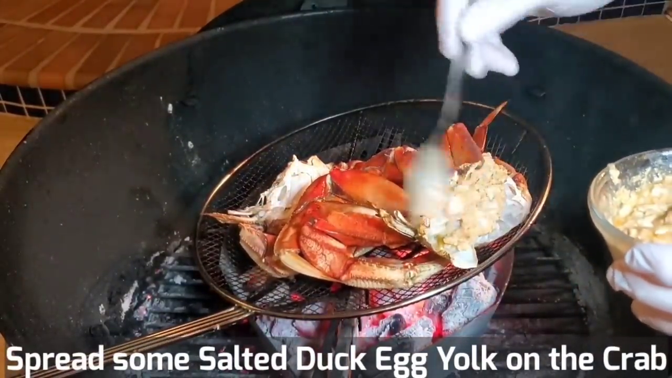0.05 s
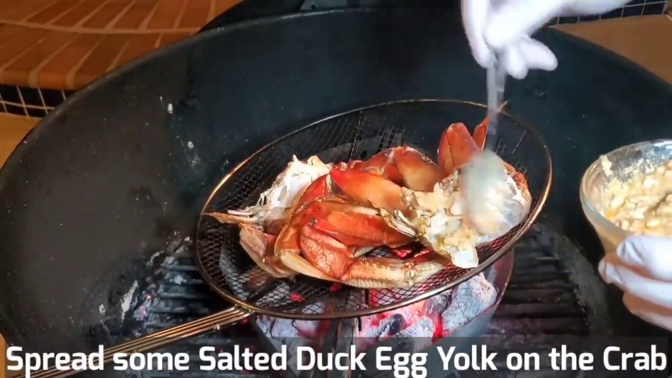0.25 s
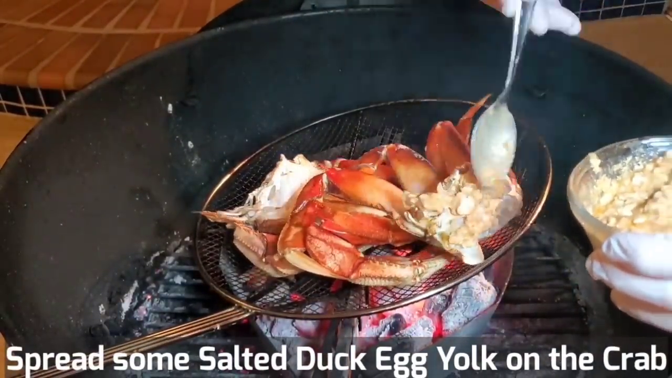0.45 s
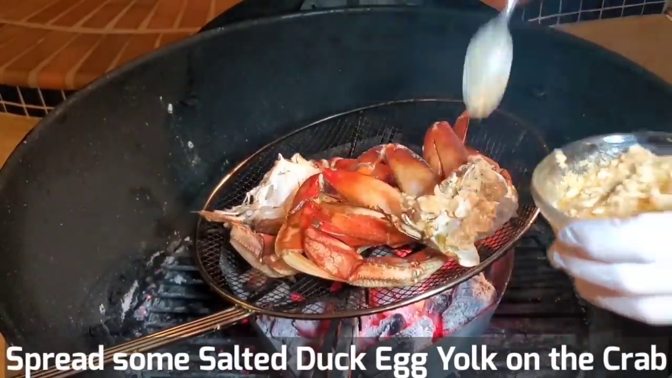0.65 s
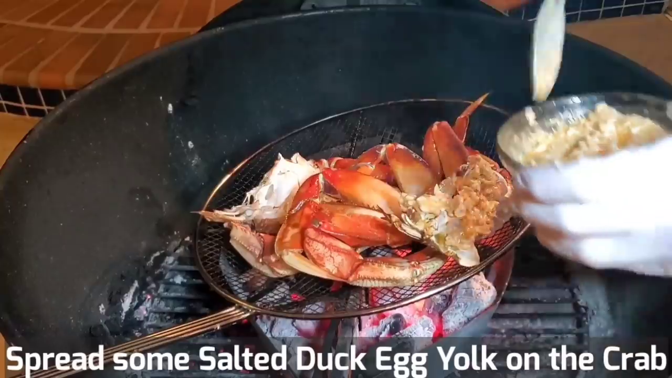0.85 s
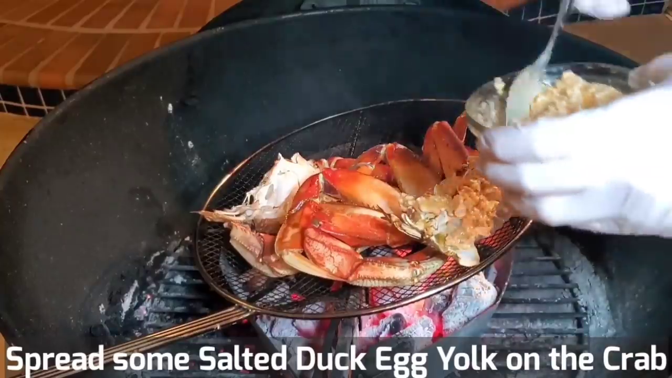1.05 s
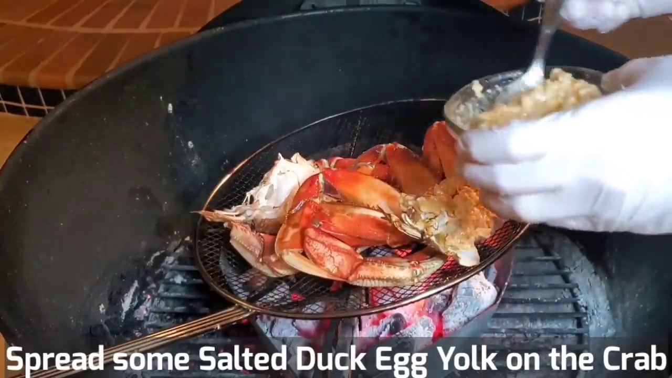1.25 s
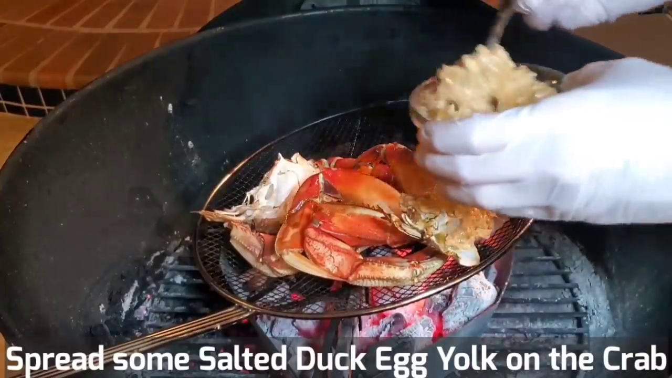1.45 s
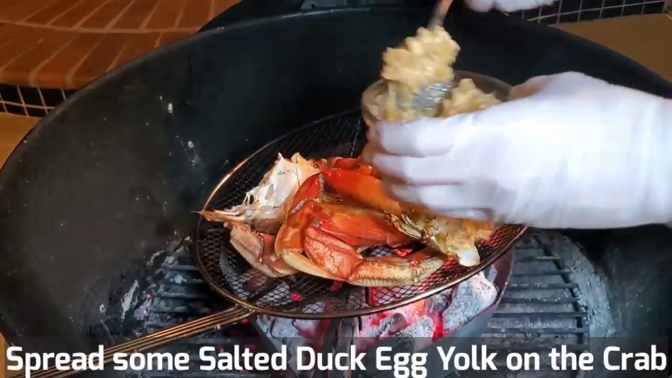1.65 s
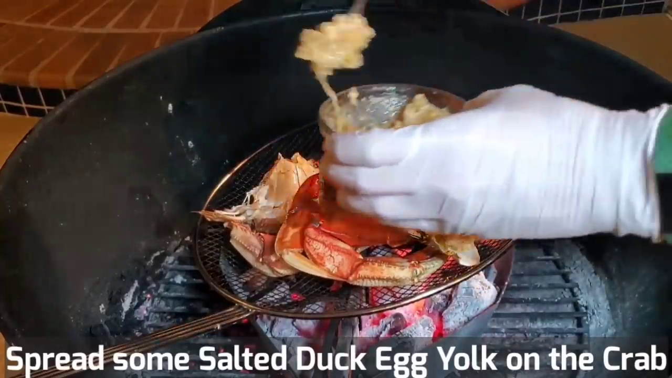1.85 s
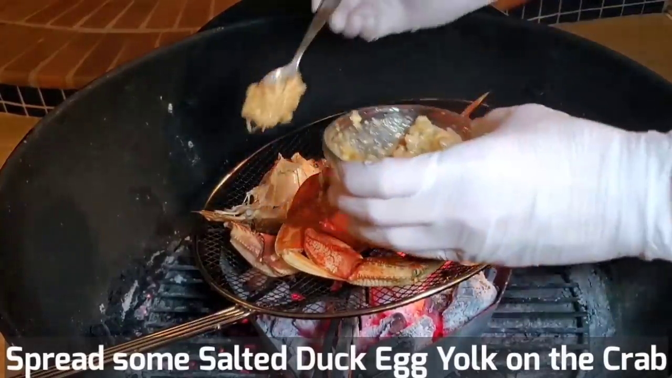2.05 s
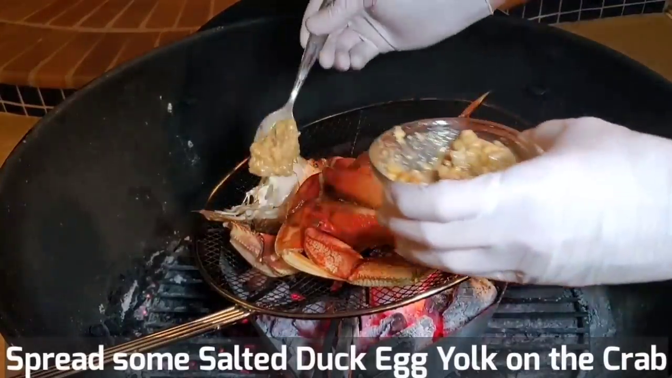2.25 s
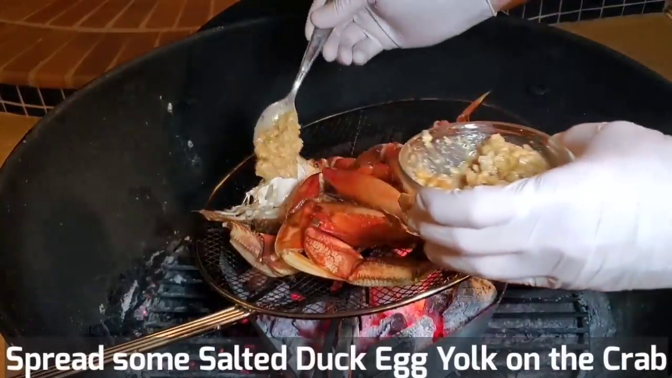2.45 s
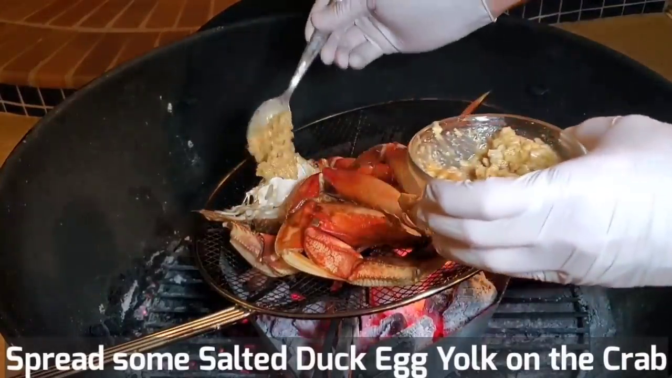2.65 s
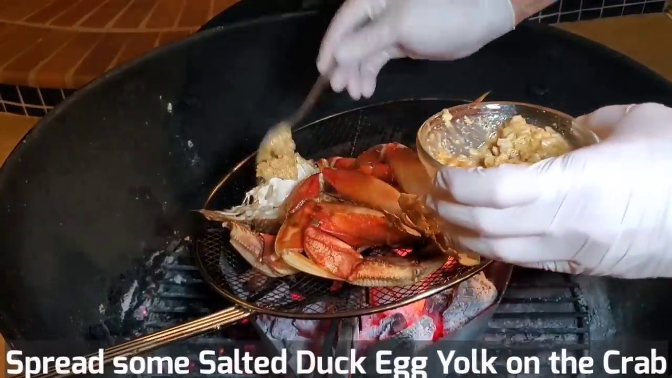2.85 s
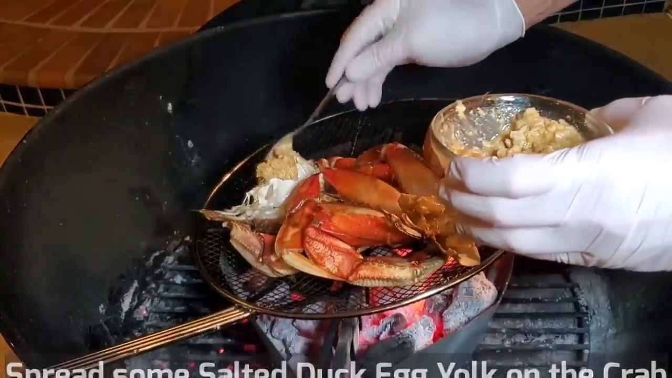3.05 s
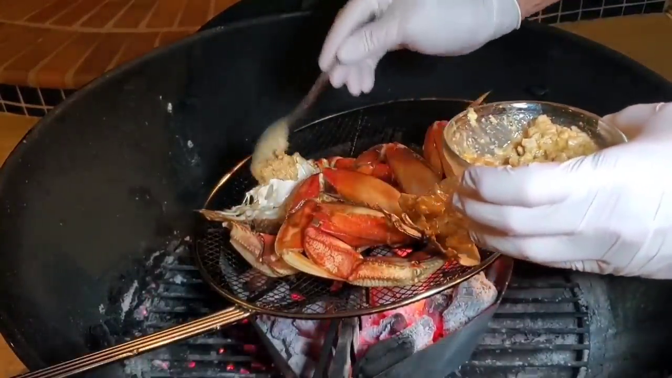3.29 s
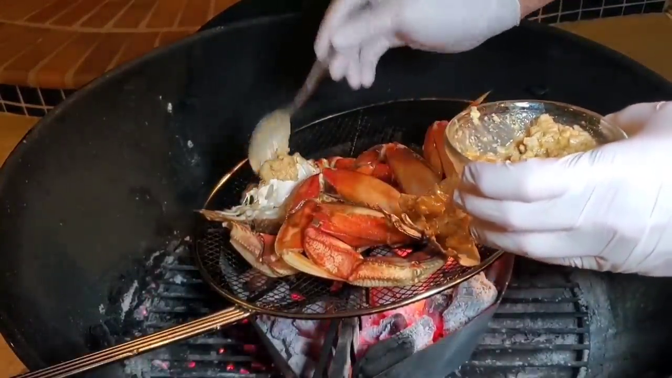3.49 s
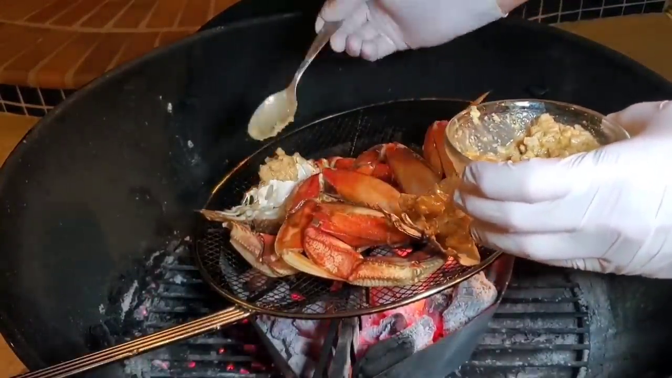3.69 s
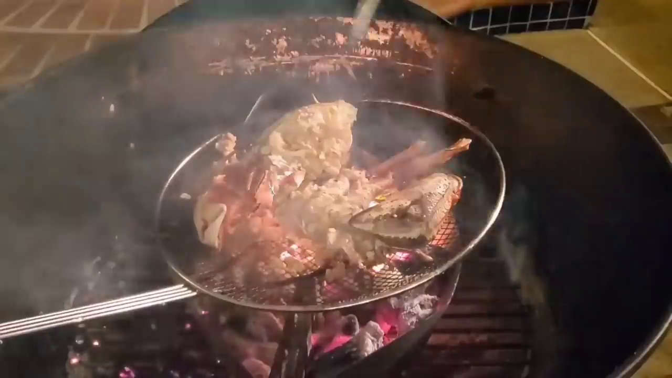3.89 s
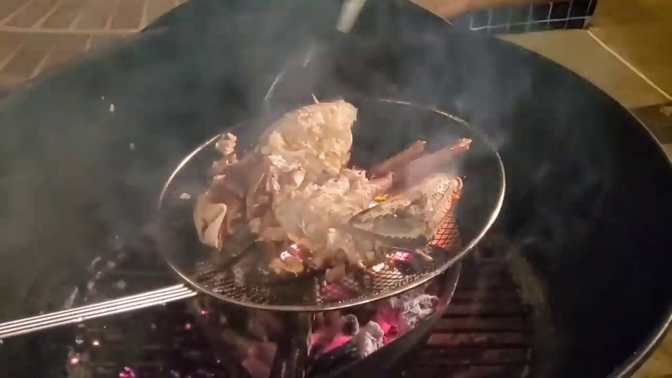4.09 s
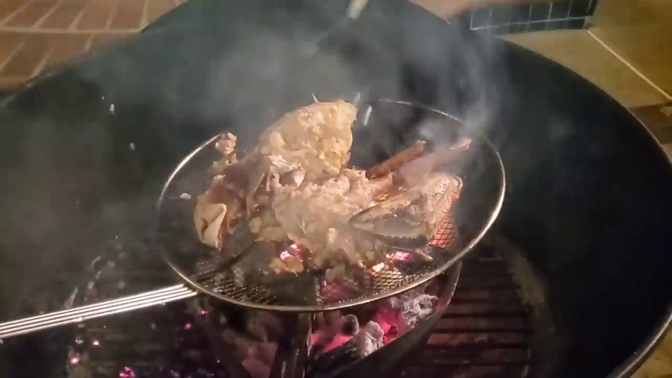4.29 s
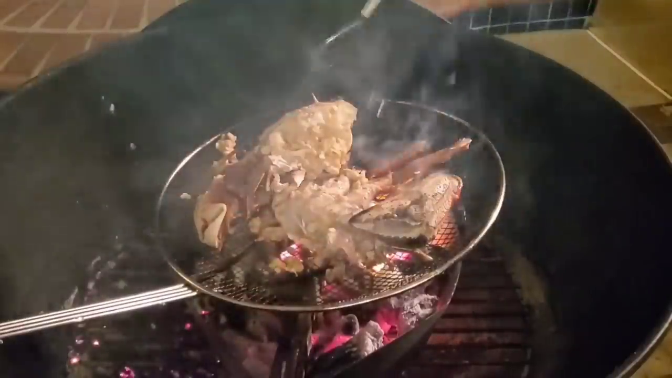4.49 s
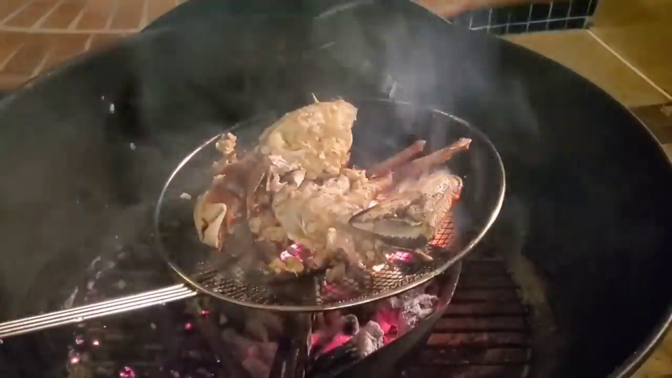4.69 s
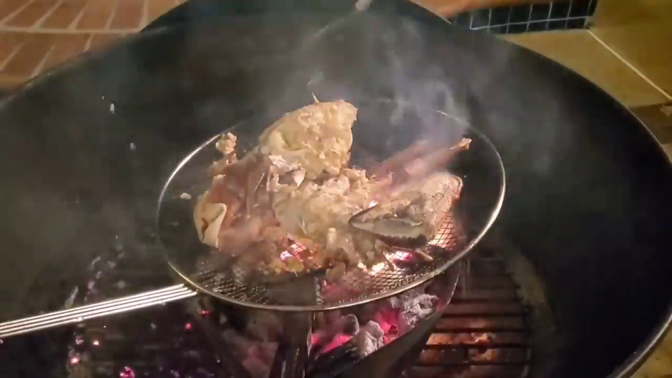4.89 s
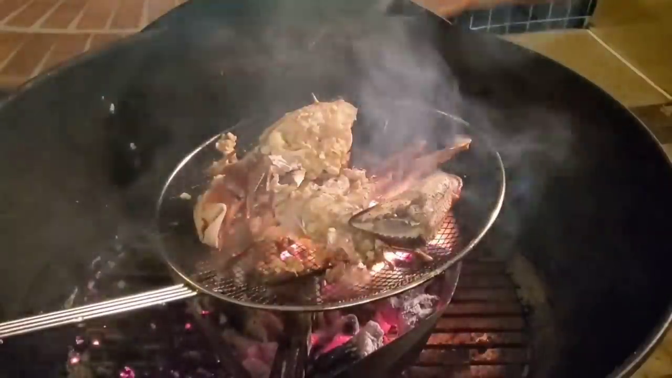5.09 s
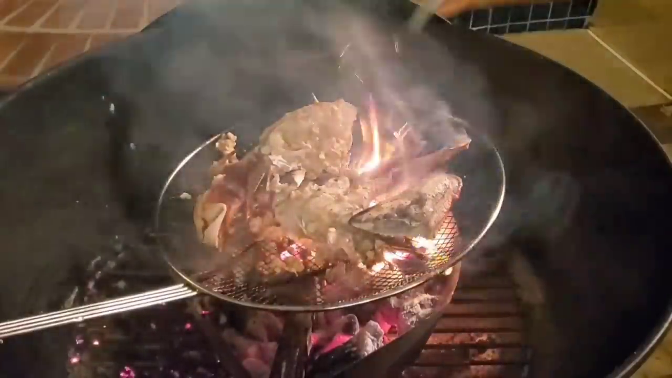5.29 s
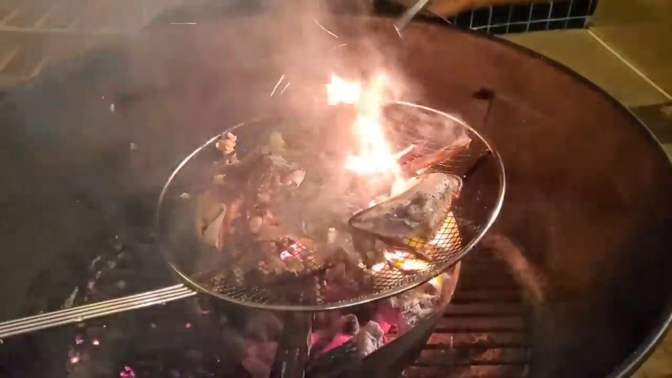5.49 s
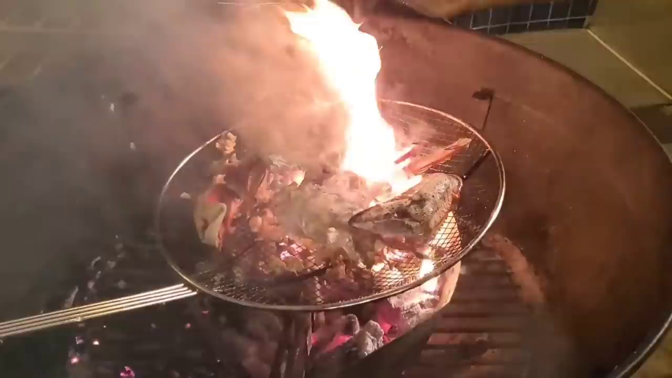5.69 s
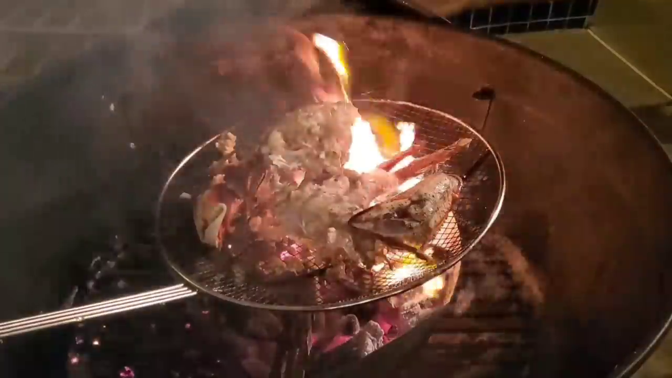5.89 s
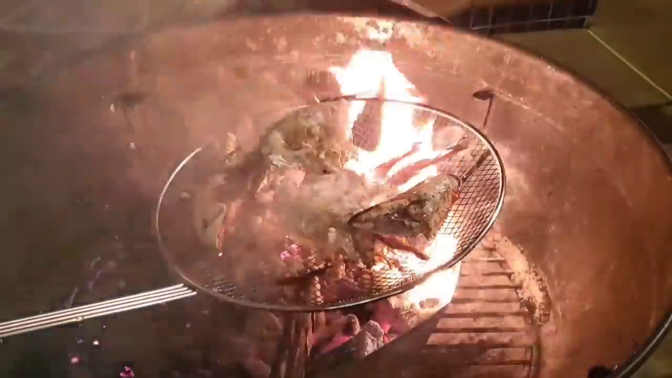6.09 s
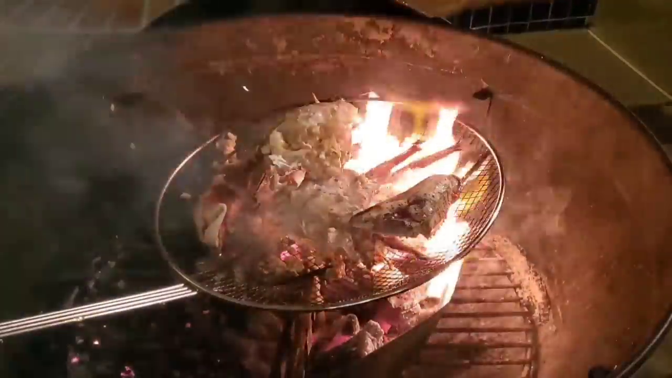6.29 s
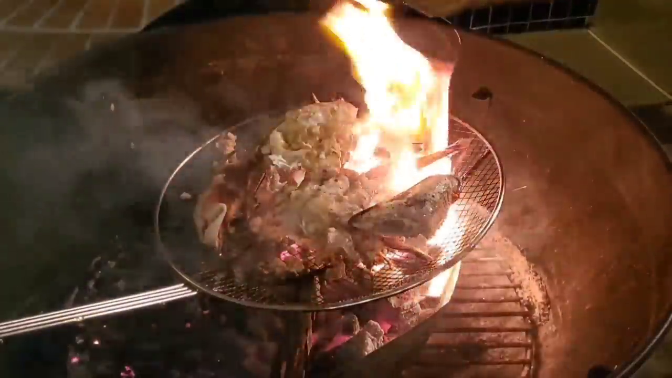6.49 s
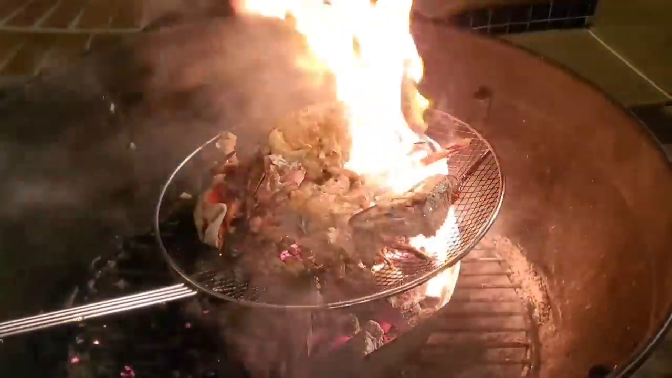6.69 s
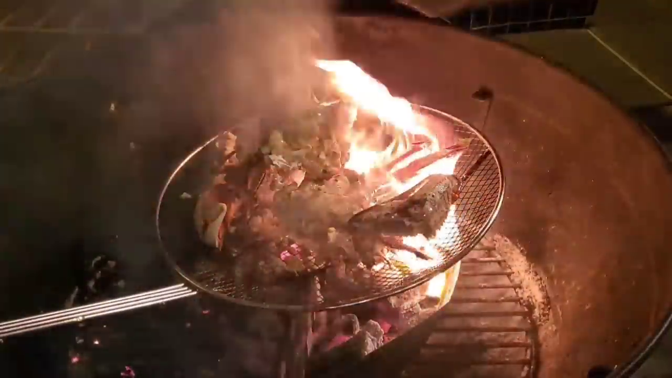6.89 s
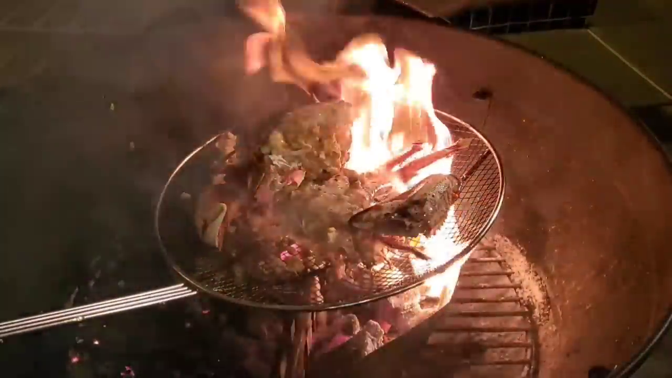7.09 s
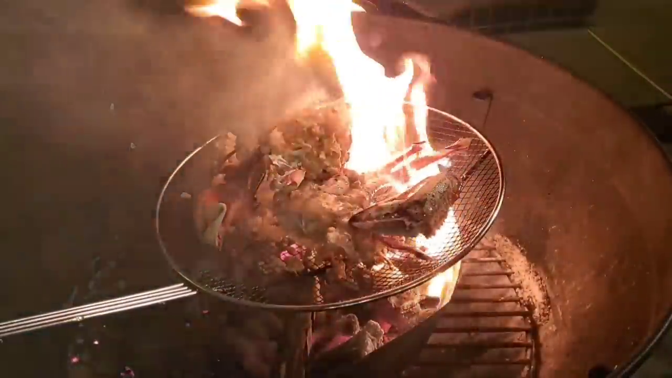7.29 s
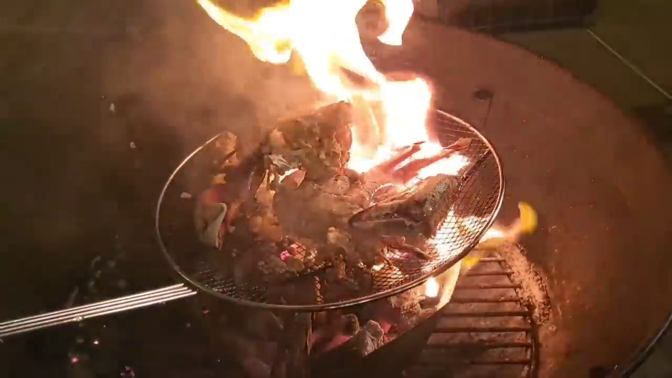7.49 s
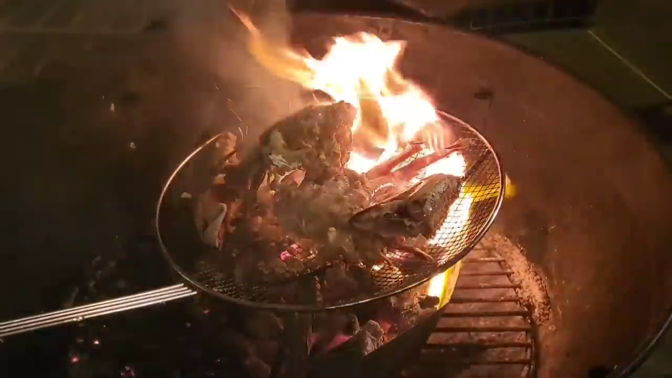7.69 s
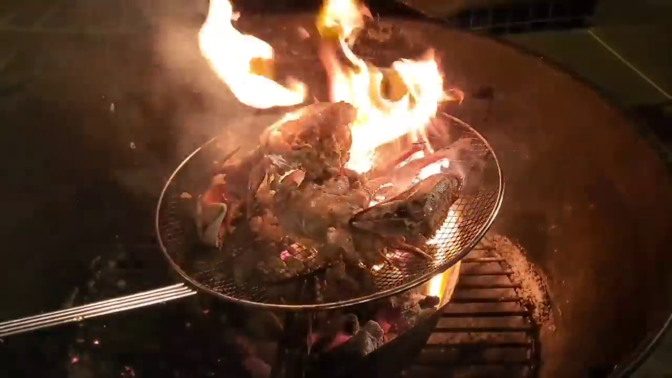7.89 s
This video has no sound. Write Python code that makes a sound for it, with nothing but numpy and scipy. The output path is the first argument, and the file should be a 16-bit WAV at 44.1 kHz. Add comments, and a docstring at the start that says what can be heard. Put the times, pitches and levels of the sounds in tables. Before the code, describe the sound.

A spoon ticks and scrapes on crab shell over a low outdoor rumble, then juices sizzle, snap and flutter over charcoal in a kettle grill.

```python
"""A spoon ticks over a low outdoor rumble, then scrapes on a crab's shell and clinks in a glass bowl.
Juices then sizzle over charcoal in a steel kettle grill, embers snap and burning drippings flutter.
Taps, scrape, sizzle and snaps are coloured noise or sparse impulses, some ringing resonances;
a thump of decaying sines and a chattering metal clank each come once, and far hoots and a whine lie behind.
Taps, snaps, spits and the thump echo in the kettle."""
import sys
import numpy as np
from scipy import signal
from scipy.fft import rfft, irfft, next_fast_len
from scipy.io import wavfile
from scipy.ndimage import uniform_filter1d, map_coordinates

SR = 44100
rng = np.random.default_rng(int(sys.argv[2]) if len(sys.argv) > 2 else 0)


def generate_wav(sig):
    """Save sig (samples, or channels by samples) to the path in sys.argv[1] as 16-bit PCM at SR."""
    pcm = np.round(np.clip(np.atleast_2d(sig).T, -1, 1) * 32767).astype(np.int16)
    wavfile.write(sys.argv[1], SR, pcm)


N = 350453
TOP_HZ = 15750  # nothing sounds above this

# Stereo likeness of most layers, of close cracks, of the draught: (frequency [Hz], left-right likeness [0-1])
ALIKE = [(40, 0.21), (80, 1), (140, 0.95), (300, 0.86), (640, 0.52), (1400, 0.49), (3100, 0.18),
         (7000, 0.0074)]
ALIKE_NEAR = [(300, 1), (1500, 0.43), (4000, 0.15), (9000, 0.041)]
ALIKE_DRAUGHT = [(30, 0.05), (100, 0.42)]
# Decay of the kettle's echo before its wall return is shaped: (frequency [Hz], t60 [s])
KETTLE_DECAY = [(200, 0.19), (1500, 0.29), (5000, 0.22), (15000, 0.2)]

# Spectra of the outdoor bed: (frequency [Hz], relative density [dB per Hz])
RUMBLE_COLOUR = [(15, -70), (25, -38), (45, 4), (62, 0), (108, 8.5), (140, 0), (195, -2.5), (285, -8),
                 (380, -18.5), (520, -24), (750, -67), (1800, -110)]
DRAUGHT_COLOUR = [(8, -70), (15, -35), (30, -9.5), (50, 2.5), (65, 1.5), (110, -17), (400, -110)]
RUSH_COLOUR = [(60, -60), (140, -2), (210, 6.5), (290, -1), (400, -11.5), (520, -4), (700, -28.5),
               (1000, -40.5), (3000, -110)]
COALS_COLOUR = [(200, -40), (600, -9), (1000, -10), (2000, -8), (3200, -7), (4500, -5.5), (8000, -5.5),
                (10000, -2), (13000, -1), (15200, 0)]
# Fader moves of rumble, hollow rush and coal hiss, before each layer's trim: (time [s], relative level [dB])
RUMBLE_MOVES = [(0.0, -54), (0.58, -49), (0.79, -58), (0.93, -52.5), (1.37, -57), (3.56, -48),
                (3.61, -53.5), (5.33, -50), (5.6, -61), (5.86, -45), (6.09, -54), (6.11, -50.5),
                (6.42, -55), (7.35, -50), (7.86, -57), (7.95, -49)]
RUSH_MOVES = [(0.0, -65.5), (0.46, -53.5), (0.77, -74), (2.54, -65.5), (2.83, -57.5), (3.14, -57.5),
              (3.83, -62), (4.25, -51), (4.6, -51.5), (5.02, -58), (5.36, -49), (6.42, -51.5),
              (6.71, -48.5), (7.08, -52.5), (7.3, -46), (7.95, -52.5)]
HISS_MOVES = [(0.0, -68.5), (0.5, -66.5), (0.67, -66.5), (0.89, -68.5), (1.21, -62), (1.71, -68),
              (2.57, -68.5), (3.04, -67), (3.43, -62), (3.85, -62.5)]
DRAUGHT_DB = -59  # the draught between gusts
# Gusts of draught: (time [s], half length [s], level [dB])
GUSTS = [(4.102, 0.083, -45.5), (5.858, 0.08, -41), (6.205, 0.16, -46.5), (6.963, 0.071, -48),
         (7.438, 0.042, -42.5)]

# Faint far hoots: (time [s], level [dB])
HOOTS = [(.745, -72), (1.725, -67), (2.745, -67), (3.73, -62)]
# Spectra of hoots and whine: (frequency [Hz], relative density [dB per Hz])
HOOT_COLOUR = [(450, -60), (660, 4), (720, -1), (800, -4), (1200, -60)]
WHINE_COLOUR = [(400, -92), (800, 0), (900, 4), (1100, -10.0), (1400, 5), (1600, -15), (3000, -78)]
WHINE_S, WHINE_DB, WHINE_RISE, WHINE_FALL = 3.83, -62, 30, 28  # peak [s], level [dB], slopes [dB/s]

# Partials of the hollow knock: (frequency [Hz], relative level [dB], t60 [s])
THUMP_PARTIALS = [(346, -7, 0.13), (292, -26, 0.086), (436, 4, 0.025), (556, -6, 0.1), (613, -10, .16),
                  (720, -15, 0.094)]
THUMP_S = 4.6572

# Contacts of the chattering metal: (time [s], relative level [dB])
CLANK_CONTACTS = [(7.2732, -17), (7.2835, -17.5), (7.2883, -29), (7.309, -20)]
# Resonances of the clanking metal: (frequency [Hz], width [Hz], relative level [dB])
STEEL_MODES = [(897, 48, -3), (1710, 23, -9), (1865, 20, 3.5), (2006, 38, 6), (2030, 59, 4.5),
               (2410, 31, -9), (2900, 40, -10), (2904, 27, 4), (3250, 24, 1), (3800, 110, -25),
               (4700, 70, 0.5), (4710, 35, -5), (5050, 34, -12), (5180, 31, 0.5), (6840, 280, -10.5),
               (8345, 60, -15), (8260, 240, -8.5), (9100, 60, -9), (10300, 80, -22), (11900, 33, -12),
               (12640, 78, -2.5), (13593, 50, -13)]
# Its dense small modes: (frequency [Hz], relative density [dB per Hz])
CLASH_COLOUR = [(250, -14.5), (700, -11), (1100, -6), (2100, -3), (3200, 1), (4100, -10), (4900, -2),
                (6200, -17), (8400, -31), (13000, -7.5), (15500, -24)]

# Flare-ups before flutter: (peak time [s], level [dB], rise [dB/s], fall [dB/s])
FLARES = [(6.52, -43.5, 400, 58), (7.95, -47, 48, 65)]
# Spectrum of the flames: (frequency [Hz], relative density [dB per Hz])
FLAME_COLOUR = [(100, -5), (220, 0), (400, -0.5), (600, 2.5), (900, -20), (1500, -11), (5000, -100)]

# Spoon taps on shell and bowl, before panning:
# (time [s], level [dB], tilt [dB per octave], ring [Hz], echo [dB])
TAPS = [(0.0862, -47.5, 4, 6160, -9), (0.1136, -25.5, 0, 10200, -8), (0.1184, -29.5, -3.5, 4220, -5),
        (0.1257, -29.5, -1, 3160, -15), (1.0644, -46.5, 4, 11870, -9), (1.1395, -41, 0, 3800, 2.5),
        (1.3757, -29.5, 0, 6000, -10.5), (1.7513, -47, 4, 13000, -1), (1.8333, -52, 4.5, 9470, -4),
        (2.2444, -37.5, 2, 13000, -3), (2.455, -45.5, -2.2, 9800, 1.5), (2.4845, -43, 2, 6300, -5),
        (2.6221, -52.5, 1, 13000, 1.5), (2.7589, -53.5, -1, 11500, 6.5), (3.3519, -47, 1.5, 12420, -3),
        (3.4745, -19.5, 3, 12100, -3.5), (3.5385, -42.5, -3, 9910, 2.5)]
# Taps before the tilt, and the scraped shell: (frequency [Hz], relative density [dB per Hz])
TAP_COLOUR = [(200, -7), (620, -12), (1050, -11), (1800, -4.5), (3000, 3), (4200, 2.5), (6500, -0.5),
              (9000, -1.5), (13000, -0.5), (15500, -1.5)]
SCRAPE_COLOUR = [(150, -6.5), (300, 1.5), (450, -13), (700, -8), (1000, -16.5), (1700, -17), (3100, -14.5),
                 (5000, -20), (7800, -23), (10000, -17), (15000, -19)]
# Clinks of the spoon in the glass bowl: (time [s], relative level [dB], best rung frequency [Hz])
CLINKS = [(1.139, -41.5, 1760), (1.3744, -41, 1370)]
# Resonances of bowl (before the landing spot favours some) and of shell:
# (frequency [Hz], width [Hz], relative level [dB])
BOWL_MODES = [(1044, 45, 1.5), (1740, 110, -1), (1900, 120, 1), (2020, 50, 0), (2980, 78, 0),
              (3820, 200, 0), (3940, 60, 6), (5140, 79, 12), (7000, 65, -2)]
SHELL_MODES = [(770, 50, 1), (1340, 55, 1), (1730, 92, 6), (2300, 90, -5), (3070, 110, 3)]
# One stroke of the spoon: start [s], hold [s], level [dB], rise and fall [dB/s]
SCRAPE_S, SCRAPE_HOLD_S, SCRAPE_DB, SCRAPE_RISE, SCRAPE_FALL = 0.43, 0.12, -47, 260, 143

# Loudest snaps of embers and spitting fat, before panning and echo trim:
# (time [s], level [dB], tilt [dB per octave], ring [Hz], relative echo [dB])
SNAPS = [(3.9683, -25, -6.5, 3780, -6.5), (4.0513, -29.5, -4, 13100, -5), (4.0703, -24.5, -3.5, 4430, -15),
         (4.1546, -29.5, -4, 3830, 0), (4.2373, -32.5, -2.5, 4200, -12), (4.3091, -29, -2, 2060, -5),
         (4.3527, -29, -5, 4150, -5), (4.5169, -23, -2, 13200, -3.5), (4.5354, -22.5, -4, 3040, -6),
         (4.602, -31, -3, 3900, 2.5), (4.6625, -28, -4.5, 2110, -9), (4.7128, -28, -0.5, 9910, -2.5),
         (4.7441, -35, -9, 1820, -12), (4.8795, -25, -5, 2900, -0.5), (5.297, -26.5, -3.5, 3830, -4),
         (5.3896, -13.5, -5, 1280, 0.5), (5.547, -32, -7, 2050, -4.5), (5.6836, -33, -5.5, 3660, 0),
         (5.7003, -29.5, 2.5, 12420, -1), (5.7246, -28, -4, 3630, -4), (5.7669, -29.5, -7, 4330, 1),
         (6.0218, -27.5, -1.5, 4670, -12), (6.0764, -22.5, -3, 4100, -2.5), (6.1102, -28, -6.5, 1880, -3),
         (6.1368, -31.5, -5.5, 1860, -14), (6.3882, -28, 2, 12420, -2), (6.4105, -22.5, -1.3, 2120, -7.5),
         (6.5042, -28.5, -4.5, 1920, 0.5), (6.7983, -28.5, -3, 10400, -6), (6.9323, -29.5, -7, 3900, 1),
         (7.1376, -23.5, -5, 1310, -5), (7.2081, -26.5, 5, 12900, -14), (7.4689, -30.5, -3.5, 12330, -15),
         (7.5844, -28.5, -1, 9910, -2), (7.6221, -29.5, -5.5, 4230, 3.5), (7.6752, -26.5, 0, 3830, 0.5),
         (7.7455, -14, -1.7, 13000, -5), (7.7684, -21.5, 1, 4700, 2.5), (7.853, -19, -3.5, 6200, -8)]
# Snaps before the tilt, and spits: (frequency [Hz], relative density [dB per Hz])
SNAP_COLOUR = [(100, -14), (300, -7.5), (700, -16), (1100, -3), (2000, 1.5), (4500, 6), (7500, 2),
               (9500, 5), (13000, 7.5), (15500, 4)]
# Lesser snaps: average density, then the centres and scatters of their random settings
CRACKLE_PER_S, CRACKLE_RING_HZ, CRACKLE_RING_SPREAD_OCTAVES = 12, 2660, 0.5
CRACKLE_DB, CRACKLE_SPREAD_DB = -36, 2.5
CRACKLE_TILT_DB, CRACKLE_TILT_SPREAD_DB = -4.5, 3.0  # per octave
CRACKLE_ECHO_DB = -8  # before the snaps' echo trim

SIZZLE_S, SIZZLE_RISE = 3.98, 178  # fully up at [s], slope into it [dB/s]
# How hard the juice boils: (time [s], relative level [dB])
VIGOUR = [(4.1, -40), (4.14, -43), (4.6, -40), (5.25, -42), (5.74, -46.5), (5.95, -42), (6.41, -43),
          (6.65, -38.5), (7.02, -42.5), (7.31, -36.5), (7.44, -38.5), (7.66, -44.5), (7.86, -37),
          (7.95, -32)]
BOIL_DB, FIZZ_DB, BOIL_GROWS = -3.5, 0.5, 1.07  # trims on the vigour; bubbles swing wider than steam
# Spectra of coarse bubbles and fine steam: (frequency [Hz], relative density [dB per Hz])
BOIL_COLOUR = [(350, -7.5), (700, -12), (1100, -1), (1500, -6.5), (2050, 0), (2800, -0.5), (3700, 1),
               (5000, -4.5), (7000, -1.5), (10000, -30)]
FIZZ_COLOUR = [(2500, -13), (5000, 1), (6500, -9.5), (7700, -7.5), (8800, 6), (11500, 3.5), (13000, 4.5),
               (14000, 6), (15500, 6.5)]
# Small spits, coarse to fine: (density [per s], ring [Hz], relative level [dB])
SPITS = [(50, 1860, -4), (61, 4200, -2.5), (42.7, 12200, -4)]


def amp(db):
    """Decibels to gain."""
    return 10 ** (np.asarray(db) / 20)


def unit(x):
    """Scaled to rms 1."""
    return x / np.sqrt(np.mean(x ** 2) + 1e-20)


def along(points, hz):
    """Interpolates (frequency, value) points on a log frequency axis."""
    f, v = np.transpose(points)
    return np.interp(np.log(hz + 1), np.log(f + 1), v)


def level(rows):
    """Joins (time, dB) points into one dB value per sample."""
    return np.interp(np.arange(N) / SR, *np.transpose(rows))


def swell(s, rise, fall, hold_s=0):
    """A gain that climbs to 1 at time s, holds, and dies away; rise and fall in dB a second."""
    t = np.arange(N) / SR - s
    return amp(rise * np.minimum(t, 0) - fall * np.maximum(t - hold_s, 0))


def wobble(rate):
    """A smooth random curve through `rate` knots a second."""
    knots = rng.standard_normal(int(N * rate / SR) + 4)
    return map_coordinates(knots, [np.arange(N) * rate / SR])


def noise(count=N):
    """Two unrelated white noises."""
    return rng.standard_normal((2, count))


def grains(rate, spread_db):
    """Sparse impulses of very unequal size, each placed somewhere between the sides."""
    at, size, place = rng.random((int(rate * N / SR), 3)).T
    size = amp(spread_db * np.minimum(-np.log(1 - size), 4))
    sample, angle = (at * N).astype(int), 2 * np.pi * place
    return np.array([np.bincount(sample, size * way(angle), N) for way in (np.cos, np.sin)])


def filtered(x, response):
    """Shapes x by a response of frequency."""
    n = x.shape[-1]
    m = next_fast_len(n + 2048)
    return irfft(rfft(x, m) * response(np.fft.rfftfreq(m, 1 / SR)), m)[..., :n]


def resonate(x, modes):
    """Rings x through a bank of (frequency, width, dB) resonances."""
    def response(f):
        return sum(amp(db) * 1j * f * width / (hz * hz - f * f + 1j * f * width) for hz, width, db in modes)
    return filtered(x, response)


def coloured(pair, spectrum, alike, tilt_db=0):
    """Two unrelated signals become left and right with a spectrum and a likeness, at rms 1."""
    def response(hz):
        turn = np.arccos(np.clip(along(alike, hz), -1, 1)) / 2
        octaves = np.log2(np.maximum(hz, 700) / 700)  # the tilt hinges at 700 Hz
        gain = amp(along(spectrum, hz) + tilt_db * octaves) * (hz < TOP_HZ)
        return gain * [np.cos(turn), np.sin(turn)]
    mid, side = filtered(pair, response)
    return unit(np.array([mid + side, mid - side]))


def patchy(x, depth_db):
    """Spots of the sound flare and fade alone, each over a narrow band and a few hundredths of a second."""
    z = signal.stft(x, nperseg=512)[2]
    field = uniform_filter1d(rng.standard_normal(z.shape[1:]), size=3, axis=0)  # across frequency
    field = uniform_filter1d(field, size=6, axis=1)  # across time
    return unit(signal.istft(z * amp(depth_db * unit(field)), nperseg=512)[1][:, :N])


def leftward(x, lean_db):
    """Pans by making the left louder by lean_db and the right two samples late."""
    late_right = np.pad(x[1], (2, 0))[:-2]
    return np.array([x[0], late_right]) * amp(np.array([[lean_db], [-lean_db]]) / 2)


def add(track, s, sound):
    """Mixes a sound in at time s."""
    part = track[:, max(0, round(s * SR)):][:, :sound.shape[1]]
    part += sound[:, :part.shape[1]]


def kettle(wall_s=0.0087, early_db=-6, first_db=6, first_s=0.0025):
    """Echo of the steel bowl, energy 1: thin at first, a strong return from the far wall, a short tail."""
    hz, t, z = signal.stft(noise(count=SR // 4), SR, nperseg=128)
    decay = amp(-60 * t / along(KETTLE_DECAY, hz)[:, None])
    tail = signal.istft(z * decay, SR, nperseg=128)[1]
    late = np.arange(tail.shape[1]) / SR - wall_s
    tail = tail * amp(np.where(late < 0, early_db, first_db * np.exp(-np.abs(late) / first_s)))
    return unit(tail) / np.sqrt(tail.shape[1])


def cracks(rows, colour, rise_s, ring_db, sharpness, echo_db):
    """Each brittle break is a short noise burst that rings its piece; the kettle answers."""
    out = np.zeros((2, N))
    lead_s = 0.002  # room ahead of the burst for the filter's spread
    t = np.maximum(np.arange(1024) / SR - lead_s, 0)
    for s, db, tilt_db, ring_hz, wet_db in rows:
        burst = noise(count=len(t)) * t * np.exp(-t / rise_s)
        burst = burst + resonate(burst, [(ring_hz, ring_hz / sharpness, ring_db)])
        # the level counts all the energy as an rms over 3 ms
        burst = amp(db) * coloured(burst, colour, ALIKE_NEAR, tilt_db) * np.sqrt(0.003 * SR / len(t))
        add(out, s - lead_s, burst)
        echo = signal.fftconvolve(burst, kettle(), axes=1)
        add(out, s - lead_s, amp(wet_db + echo_db) * echo)
    return out


def outdoors():
    """Shaped noises make low rumble, gusty draught, hollow rush and coal hiss; a wavering sine hums."""
    t = np.arange(N) / SR
    gusts = sum(amp(db) * np.exp(-((t - s) / half_s) ** 2) for s, half_s, db in GUSTS)
    draught_gain = amp(DRAUGHT_DB + 1.5 * wobble(8.9)) + gusts
    draught = draught_gain * coloured(noise(), DRAUGHT_COLOUR, ALIKE_DRAUGHT)
    rumble_gain = amp(level(RUMBLE_MOVES) + 2.0 + 0.8 * wobble(9.7))
    rumble = rumble_gain * coloured(noise(), RUMBLE_COLOUR, ALIKE)
    hum = amp(-56.5 + 0.83 * wobble(3.2)) * np.sin(2 * np.pi * 75 * t + 2.5 * wobble(4.13))
    rush_gain = amp(level(RUSH_MOVES) - 2.5 + 1.9 * wobble(8))
    rush = rush_gain * coloured(noise(), RUSH_COLOUR, ALIKE)
    grainy = noise() + amp(-8.5) * unit(grains(rate=240, spread_db=5.0))
    hiss = amp(level(HISS_MOVES) + 4) * coloured(grainy, COALS_COLOUR, ALIKE)
    return draught + rumble + hum + rush + hiss


def distance():
    """Far off, swells of narrow-band noise make four soft hoots and a brief whine."""
    t = np.arange(N) / SR
    calls = sum(amp(db) * np.exp(-((t - s) / 0.026) ** 2) for s, db in HOOTS)
    hoots = calls * coloured(noise(), HOOT_COLOUR, ALIKE)
    whine_gain = amp(WHINE_DB) * swell(WHINE_S, WHINE_RISE, WHINE_FALL)
    whine = whine_gain * coloured(noise(), WHINE_COLOUR, ALIKE)
    return hoots + whine


def thump():
    """One dull, hollow knock of decaying sines, and the kettle's answer."""
    out, t = np.zeros((2, N)), np.arange(SR // 3) / SR
    body = sum(amp(db - 60 * t / t60) * -np.sin(2 * np.pi * hz * t) for hz, db, t60 in THUMP_PARTIALS)
    knock = amp(-26) * (1 - np.exp(-t / 0.0004)) * np.array([body, body])
    add(out, THUMP_S, knock)
    add(out, THUMP_S, amp(-8) * signal.fftconvolve(knock, kettle(), axes=1))
    return leftward(out, lean_db=2.5)


def clank():
    """Loose metal lands and chatters: each contact's dying rattle drives the same resonances."""
    rattle, t = np.zeros((2, N)), np.arange(SR // 2) / SR
    blow = amp(-2.5 - 60 * t / 0.013)
    dying = amp(-60 * t / 0.13) + amp(-15 - 60 * t / 0.55)
    for s, db in CLANK_CONTACTS:
        add(rattle, s, amp(db) * (blow + dying) * noise(count=len(t)))
    ring = unit(resonate(rattle, STEEL_MODES))
    clash = coloured(patchy(rattle, depth_db=5.5), CLASH_COLOUR, ALIKE)
    body = amp(-0.5) * ring + amp(-3.5) * clash
    return leftward(np.std(rattle) * body, lean_db=0)


def flames():
    """Burning drippings flare up and flutter: low, hollow noise with an unsteady gain."""
    flare = sum(amp(db) * swell(s, rise, fall) for s, db, rise, fall in FLARES)
    flutter = amp(0.75 * wobble(25))
    return flare * flutter * coloured(noise(), FLAME_COLOUR, ALIKE)


def spoon():
    """The spoon ticks on the shell, clinks in the bowl, and drags once over rough shell in small slips."""
    slips = unit(grains(rate=500, spread_db=3.0)) + amp(6) * noise()
    slips = patchy(slips, depth_db=1.5) * amp(1.4 * wobble(109.3))
    stroke = amp(SCRAPE_DB) * swell(SCRAPE_S, SCRAPE_RISE, SCRAPE_FALL, SCRAPE_HOLD_S)
    scrape = stroke * coloured(slips + resonate(slips, SHELL_MODES), SCRAPE_COLOUR, ALIKE)
    clinks, t = np.zeros((2, N)), np.arange(SR // 5) / SR
    for s, db, best_hz in CLINKS:
        touch = noise(count=len(t)) * (amp(-60 * t / 0.0098) + amp(-15.5 - 60 * t / 0.27))
        # where the spoon lands decides which modes ring most
        modes = [(hz, width, mode_db - 7 * abs(np.log2(hz / best_hz))) for hz, width, mode_db in BOWL_MODES]
        add(clinks, s, amp(db - 14.5) * unit(resonate(touch, modes)))
    taps = cracks(TAPS, TAP_COLOUR, rise_s=0.0014, ring_db=3, sharpness=2.9, echo_db=0)
    return leftward(scrape + clinks + taps, lean_db=3.0)


def embers():
    """Embers and fat snap: a few loud bursts, with lesser ones of scattered size and pitch between them."""
    span_s = N / SR - SIZZLE_S
    chance = rng.uniform(-1, 1, (int(CRACKLE_PER_S * span_s), 4))
    lesser = []
    for at, size, bright, pitch in chance:
        lesser.append((SIZZLE_S + span_s * (at + 1) / 2,
                       CRACKLE_DB + CRACKLE_SPREAD_DB * size,
                       CRACKLE_TILT_DB + CRACKLE_TILT_SPREAD_DB * bright,
                       CRACKLE_RING_HZ * 2 ** (CRACKLE_RING_SPREAD_OCTAVES * pitch),
                       CRACKLE_ECHO_DB))
    snaps = cracks(SNAPS + lesser, SNAP_COLOUR, rise_s=0.00083, ring_db=1.5, sharpness=10, echo_db=0.5)
    return leftward(snaps, lean_db=3.0)


def sizzle():
    """Juice boils on hot shell: coarse bursting bubbles, a fine fizz of steam, and small ringing spits."""
    vigour_db, onset = level(VIGOUR), swell(SIZZLE_S, SIZZLE_RISE, 0)
    mean_db = vigour_db.mean()
    boil = onset * amp(BOIL_DB + mean_db + BOIL_GROWS * (vigour_db - mean_db))
    fizz = onset * amp(FIZZ_DB + vigour_db)
    spurts = wobble(55)  # uneven boiling drives bubbles and steam together
    bursting = unit(grains(rate=800, spread_db=4.4)) + amp(2) * noise()
    prickling = unit(grains(rate=1400, spread_db=3.6)) + amp(2.5) * noise()
    bubbles = coloured(patchy(bursting, depth_db=2.5), BOIL_COLOUR, ALIKE)
    spray = coloured(patchy(prickling, depth_db=1.5), FIZZ_COLOUR, ALIKE)
    drops = 0
    for rate, ring_hz, db in SPITS:
        bursts = grains(rate, spread_db=0.5)
        ringing = resonate(bursts, [(ring_hz, ring_hz / 3, 0)])
        drops = drops + amp(db) * unit(amp(-12) * bursts + ringing)
    spits = coloured(drops, SNAP_COLOUR, ALIKE_NEAR)
    spits = spits + amp(-5) * signal.fftconvolve(spits, kettle(), axes=1)[:, :N]
    coarse = boil * (amp(2.05 * spurts) * bubbles + amp(-6) * spits)
    fine = fizz * amp(-0.5 + 1.5 * spurts + 1.3 * wobble(30)) * spray
    return leftward(coarse, lean_db=3.0) + leftward(fine, lean_db=0.2)


def scene():
    """Everything around the grill, background first."""
    return outdoors() + distance() + thump() + clank() + flames() + spoon() + embers() + sizzle()


def record(dry):
    """Softly rounds off the highest peaks and keeps nothing above the band limit."""
    held = dry / (1 + np.abs(dry / 0.85) ** 4) ** (1 / 4)
    return filtered(held, lambda hz: hz < TOP_HZ)


dry = scene()
out = record(dry)
generate_wav(out)
```